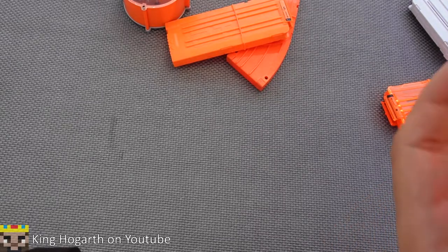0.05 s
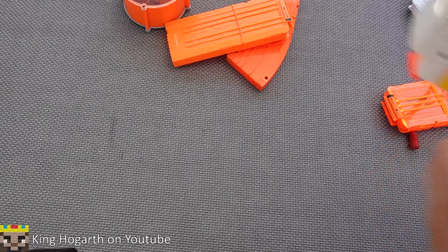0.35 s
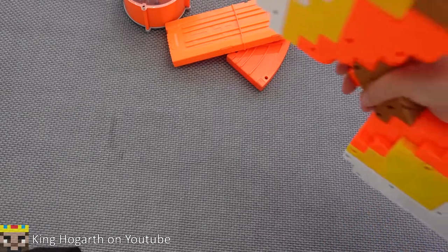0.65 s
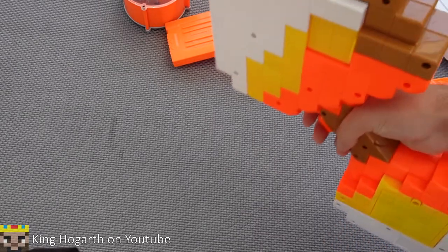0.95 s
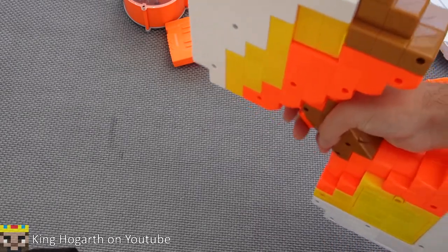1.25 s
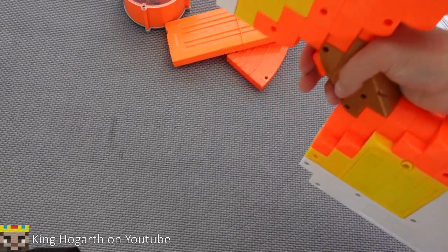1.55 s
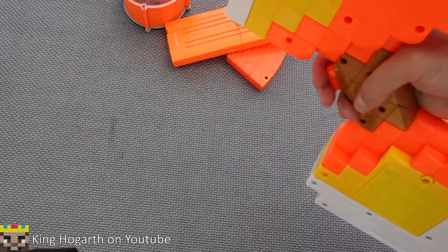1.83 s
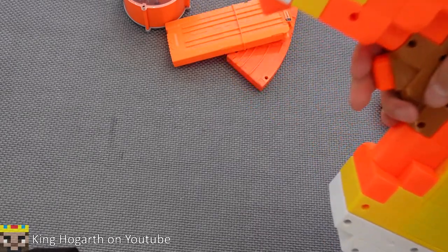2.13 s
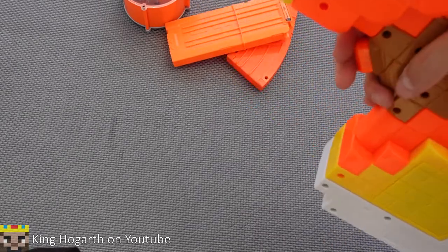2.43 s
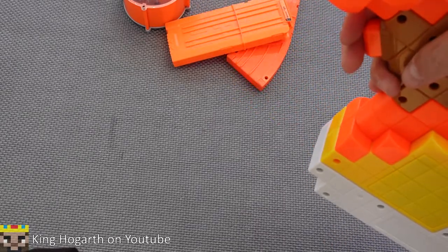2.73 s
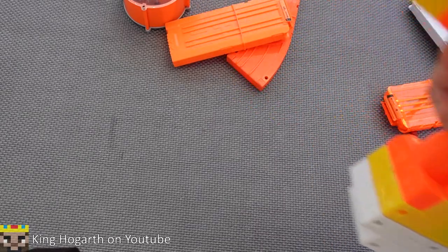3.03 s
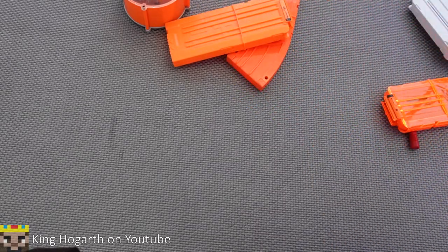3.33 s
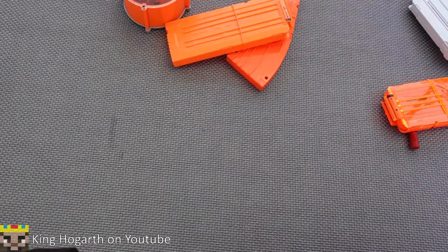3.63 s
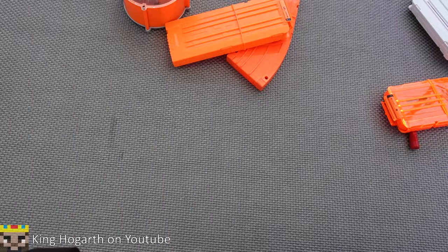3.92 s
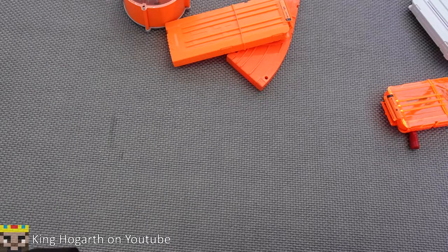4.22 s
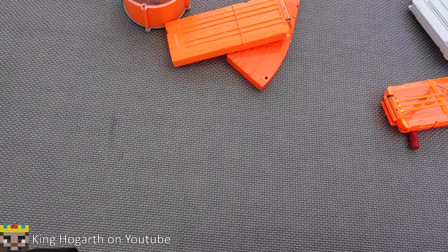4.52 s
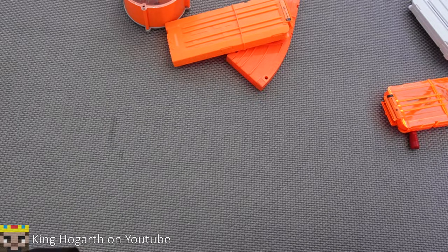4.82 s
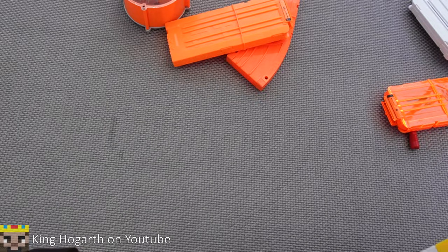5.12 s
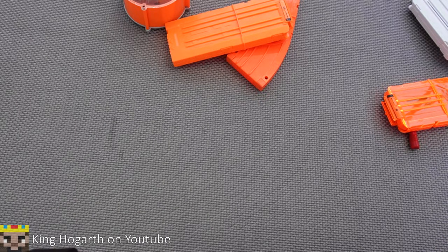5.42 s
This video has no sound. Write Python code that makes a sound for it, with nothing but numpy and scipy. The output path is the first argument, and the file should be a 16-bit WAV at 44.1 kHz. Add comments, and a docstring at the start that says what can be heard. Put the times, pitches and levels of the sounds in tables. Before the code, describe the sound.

Close, sharp plastic clacks as a toy dart blaster is cocked twice, followed by a plastic magazine scraping, rattling and being set down.

```python
"""A small, quiet room. A toy dart blaster is picked up from a mat and its slide is worked twice:
the strokes scrape along the rails by stick and slip, and four of the clacks set the spring ringing.
Then a hollow plastic magazine is pushed against it, rattling and scraping, and is set down with a
few knocks. Clacks and knocks are brief chatter between loose parts, coloured by the plastic shells."""
import sys
import numpy as np
from scipy import signal
from scipy.fft import rfft, irfft
from scipy.io import wavfile
from scipy.ndimage import uniform_filter1d

SR = 44100
rng = np.random.default_rng(int(sys.argv[2]) if len(sys.argv) > 2 else 0)


def inscribe(sig):
    """Save sig as 16-bit PCM at rate SR to the path in sys.argv[1].

    A 1-D sig is mono; a 2-D sig holds one channel per row.
    Samples are clipped to [-1, 1] before scaling.
    """
    pcm = np.round(np.clip(np.atleast_2d(sig).T, -1, 1) * 32767)
    wavfile.write(sys.argv[1], SR, pcm.astype(np.int16))


N = 245284
TIME = np.arange(N) / SR
FFT_SIZE = 4096
HZ = np.maximum(np.fft.rfftfreq(FFT_SIZE, 1 / SR), 1)


def from_db(db):
    """Decibels to gain."""
    return 10 ** (np.asarray(db) / 20)


def rms_one(x):
    """Scale to unit rms."""
    return x / np.sqrt(np.mean(x ** 2) + 1e-20)


def evened(x, window_s):
    """Hold the running rms at 1, leaving the fine grain."""
    return x / np.sqrt(np.abs(uniform_filter1d(x * x, int(window_s * SR))) + 1e-12)


def at_hz(points, hz):
    """Read a table on a log-frequency axis."""
    known_hz, values = np.transpose(points)
    return np.interp(np.log(hz), np.log(known_hz), values)


def add(track, start_s, sound):
    """Mix a sound into a track."""
    start = int(start_s * SR)
    track[start:start + len(sound)] += sound[:N - start]


def cut(x, hz, kind):
    """Third-order Butterworth filter."""
    return signal.sosfilt(signal.butter(3, hz, kind, fs=SR, output="sos"), x)


def coloured(x, gains_db):
    """Minimum-phase filter with gains on the HZ grid."""
    cepstrum = irfft(np.log(from_db(gains_db)))
    cepstrum[1:FFT_SIZE // 2] *= 2
    cepstrum[FFT_SIZE // 2 + 1:] = 0
    return signal.fftconvolve(x, irfft(np.exp(rfft(cepstrum))))[:len(x)]


def share_db(gains_db, low_hz, high_hz):
    """Share of a spectrum's power in one band."""
    power = from_db(gains_db) ** 2
    return 10 * np.log10(power[(HZ > low_hz) & (HZ < high_hz)].sum() / power.sum())


# Each row: frequency in Hz, left-right correlation.
DIFFUSE_CORRELATION = [(60,0.46),(700,0.87),(2000,0.74),(4000,0.22),(8000,.1),(15000,0.11)]

def diffuse(count):
    """White stereo noise at two close microphones: alike in the lows and mids, barely in the treble."""
    mid, side = rfft(rng.standard_normal((2, count)))
    alike = at_hz(DIFFUSE_CORRELATION, np.fft.rfftfreq(count, 1 / SR) + 1)
    return irfft(np.sqrt(1 + alike) * mid + np.sqrt(1 - alike) * side * [[1], [-1]], count)


# Each row: frequency in Hz, relative noise density in dB.
ROOM_NOISE_SPECTRUM = [(15, -64.5), (25, -38), (105, -18), (263, -17), (309, -13), (695, -5), (1040, -1),
                       (1370, -2.5), (2910, -7), (4140, -14), (4870, -12.5), (5730, -14.5), (16000, -30)]

def room_noise(rms_db):
    """Steady, diffuse hush."""
    hush = np.array([coloured(channel, at_hz(ROOM_NOISE_SPECTRUM, HZ)) for channel in diffuse(N)])
    return from_db(rms_db) * rms_one(hush)


# Each row: frequency in Hz, T60 of the tail in seconds.
ROOM_DECAY = [(300,0.47),(800,0.77),(2000,0.27),(5500,0.4),(14000,0.39)]

def room_echoes(x, early_db, early_t60_s, late_db=-19):
    """Quick reflections from things nearby, then a faint tail that dies sooner in the treble."""
    t = TIME[:SR // 2]
    gap_s = .003
    noise = diffuse(len(t)) * np.clip((t - gap_s) / .0026, 0, 1)
    edges_hz = np.geomspace(100, 16000, num=9)
    late = sum(cut(noise, [lo, hi], "band") * from_db(-60 * t / at_hz(ROOM_DECAY, np.sqrt(lo * hi)))
               for lo, hi in zip(edges_hz, edges_hz[1:]))
    early = diffuse(len(t)) * (t > gap_s) * from_db(-60 * t / early_t60_s)
    response = (from_db(early_db) * rms_one(early) + from_db(late_db) * rms_one(late)) / np.sqrt(len(t))
    return signal.fftconvolve(x[None], response, axes=1)[:, :N]


def microphones(x, left_lag_samples, scatter_db, scatter_hz):
    """Direct sound in stereo; treble takes short detours that change as the toy moves."""
    left = np.interp(np.arange(N) - left_lag_samples, np.arange(N), x)
    treble = cut(x, scatter_hz, "high")
    knots_s = np.arange(0, TIME[-1], .03)
    detour_samples = range(5, 45, 4)
    weights = np.array([np.interp(TIME, knots_s, rng.standard_normal(len(knots_s)))
                        for _ in detour_samples])
    weights /= np.linalg.norm(weights, axis=0)
    side = sum(weight * np.roll(treble, lag) for weight, lag in zip(weights, detour_samples))
    return np.array([left, x]) + from_db(scatter_db) * side * [[1], [-1]]


def peak_db(hz, width_hz, lift_db):
    """Bell-shaped lift of one damped resonance."""
    return lift_db / (1 + (2 * (HZ - hz) / width_hz) ** 2)


def plastic_shell_db(colour, modes):
    """Response of a shell: a broad hump with resonances on it."""
    return at_hz(colour, HZ) + sum(peak_db(*mode) for mode in modes)


def driven_mode(hz, width_hz):
    """A damped resonance under random drive: its phase wanders as fast as it is wide."""
    wander = np.cumsum(rng.standard_normal(N)) * np.sqrt(2 * np.pi * width_hz / SR)
    return np.sin(2 * np.pi * hz * TIME + uniform_filter1d(wander, size=40))


def hand_effort(t, start_s, attack_s, hold_s, release_s):
    """A hand movement, 0 to 1: it builds as a power of time, holds and dies away."""
    rise = np.clip((t - start_s) / attack_s, 0, 1) ** 1.68
    return rise * np.exp(-np.clip((t - start_s - attack_s - hold_s) / release_s, 0, 20))


def stick_slip(slips_per_s, spread_db, ring_s, points=8):
    """Random clicks of uneven size at several contact points, each with its own short ring."""
    sizes = from_db(spread_db * np.minimum(rng.exponential(1, N), 4)) * rng.choice([-1, 1], N)
    clicks = sizes * (rng.random(N) < slips_per_s / SR)
    point = rng.integers(points, size=N)
    rings = rng.standard_normal((points, FFT_SIZE)) * np.exp(-TIME[:FFT_SIZE] / ring_s)
    rubbed = sum(signal.oaconvolve(clicks * (point == k), ring)[:N] for k, ring in enumerate(rings))
    mean_power = np.mean(np.abs(rfft(rings)) ** 2, axis=0)
    return coloured(rubbed, -10 * np.log10(mean_power))   # together the points favour no pitch


def clacks(rows, shell_db, ring_width_hz, rise_s, contact_s, ripple_db):
    """Each clack is a few ms of chatter between loose parts, coloured by where the shell is hit."""
    out, t = np.zeros(N), TIME[:FFT_SIZE]
    firm_db, longest_contact_s, level_window_s = -12, .006, .005
    noises = rng.standard_normal((len(rows), FFT_SIZE))
    ripple_hz = np.geomspace(250, 16000, num=48)
    ripples = ripple_db * rng.standard_normal((len(rows), len(ripple_hz)))   # no two blows alike
    thud_band = at_hz([(100, .49), (270, .12), (390, 1), (520, .9), (950, .033)], HZ)
    edge_band = at_hz([(3500, .013), (6500, 1)], HZ)
    for (start_s, db, hz, lift_db, thud_db, edge_db), noise, ripple in zip(rows, noises, ripples):
        linger = from_db(firm_db - db) ** .37   # softer blows chatter longer
        force = noise * np.exp(-t / min(contact_s * linger, longest_contact_s))
        force *= 1 - np.exp(-t / rise_s)   # the plastic gives as contact builds
        force_db = 10 * np.log10(uniform_filter1d(np.abs(rfft(force)) ** 2, size=40) + 1e-9)
        gains_db = shell_db + np.interp(HZ, ripple_hz, ripple) + peak_db(hz, ring_width_hz, lift_db)
        thud_trim_db = thud_band * (thud_db - share_db(gains_db, 200, 700))
        edge_trim_db = edge_band * (edge_db - share_db(gains_db, 5000, 14000))
        # The blow is whitened, so the shell gives the colour.
        clack = coloured(force, gains_db + thud_trim_db + edge_trim_db - force_db)
        add(out, start_s, from_db(db) * clack * np.sqrt(level_window_s * SR / np.sum(clack ** 2)))
    return out


def grip_ticks(shell_db, rms_db):
    """The plastic ticks faintly in the hand."""
    ticks = stick_slip(slips_per_s=25, spread_db=-2.5, ring_s=.0063)
    return from_db(rms_db) * rms_one(coloured(ticks, shell_db))


# Pressing lowers the case's boom. Each row: frequency in Hz, gain in dB.
BOOM_SPECTRUM = [(30,8), (70,4.5), (140,-2), (240,-4.5), (320,9), (450,0), (680,2)]
# Each row: start, attack, hold and release in seconds, level in dB, relative edge and boom in dB.
PUSHES = [(3.428,.022,.012,0.0089,-53,2,-26.5), (3.478,0.026,0.0045,0.034,-34.5,-8.5,-11),
          (3.61,0.04,0.12,0.019,-20.5,-9.5,-14.5), (3.805,0.015,0.21,.032,-19,-4,-13),
          (4.171,0.017,0.065,.050,-20.5,-3.5,-14.5), (4.362,.025,0.025,0.024,-40.5,-2,-41),
          (5.250,.036,0.1,0.022,-20.5,-7.5,-14.5)]

def magazine_scrape(shell_db):
    """Ribs catch and let go in coarse slips; firm pushes make the hollow case boom."""
    rasp = coloured(stick_slip(slips_per_s=900, spread_db=0, ring_s=.0015), shell_db)
    body = evened(cut(rasp, [700, 5200], "band"), window_s=.018)
    edge = evened(cut(rasp, 5230, "high"), window_s=.012)
    boom = evened(cut(coloured(rasp, at_hz(BOOM_SPECTRUM, HZ)), [45, 680], "band"), window_s=.023)
    out = np.zeros(N)
    for *timing, db, edge_db, boom_db in PUSHES:
        push = hand_effort(TIME, *timing)
        edge_gain = from_db(edge_db) * push ** .96   # dies last as the push eases
        boom_gain = from_db(boom_db) * push ** 1.9   # dies first
        out += from_db(db) * (push * body + edge_gain * edge + boom_gain * boom)
    return out


def rattle_rows(per_push=18, knocks_per_s=50, low_hz=1300, high_hz=3600):
    """Small random knocks for clacks(): the magazine jiggles as hard as it is pushed."""
    over_scrape_db, spread_db = 1, 1.5
    lift_db, thud_db, edge_db = 10, -18, -2.5
    rows = []
    for *timing, push_db, _, _ in PUSHES:
        jitter, pitch = rng.random((2, per_push))
        starts_s = np.minimum(timing[0] + (np.arange(per_push) + jitter) / knocks_per_s, TIME[-1])
        effort_db = 20 * np.log10(hand_effort(starts_s, *timing) + 1e-6)
        levels_db = push_db + over_scrape_db + effort_db - spread_db * rng.standard_normal(per_push)
        rings_hz = low_hz * (high_hz / low_hz) ** pitch
        rows += [(*knock, lift_db, thud_db, edge_db) for knock in zip(starts_s, levels_db, rings_hz)]
    return rows


# Each row: frequency in Hz, gain in dB.
MAGAZINE_SHELL_SPECTRUM = [(30,-44),(140,-27.5),(240,-23.5),(340,-11.5),(450,-2),(750,-9),(1400,-2),(2400,0.5),(4700,-3),(7500,-18.5),(11000,-25),(16000,-34)]
# Each row: frequency in Hz, width in Hz, lift in dB.
MAGAZINE_SHELL_MODES = [(407,120,3.7),(466,78,3),(714,70,3.8),(1030,58,4.8),(1315,44,3.8),(1730,320,2.9),(2630,480,2.9),(3370,220,1.55),(4270,550,0.93)]
# Each row: start in seconds, level in dB, ring in Hz, its lift in dB, thud in dB, edge in dB.
MAGAZINE_HITS = [(.526,-18.5,4400,5.5,-13.5,-5), (3.354,-40,1780,8,-0.5,-40), (3.513,-16,1750,3,-21.5,-7),
                 (3.556,-22.5,1780,4.5,-17.5,-11.5), (3.618,-18.5,1580,8,-21,-8),
                 (3.643,-19.5,4100,15,-32,-15), (3.658,-14.5,2660,12,-5.5,-8), (3.669,-15,2220,9,-23,-10),
                 (3.681,-12,2030,7,-39,-8), (3.731,-15.5,1680,6,-20,-4), (3.747,-13.5,1330,15,-14,-7),
                 (3.819,-11.5,1920,2,-7.5,-29), (3.836,-9.5,2940,7,-8,-3), (3.9,-15,3250,15,-16,-3),
                 (3.91,-16.5,2490,15,-20,-20), (3.958,-12,2650,6,-30,-8), (3.939,-12,3500,14,-12,-3),
                 (3.981,-9.5,2640,6,-15,-5), (4.0,-13,3600,4,-6,-14), (4.031,-13.5,2380,2,-20,-12),
                 (4.058,-17,4970,6,-33,4.5), (4.145,-38,2440,9,-24,-9), (4.159,-40.5,1680,16,-6,-15),
                 (4.18,-13,1030,9,-12.5,-36), (4.186,-13.5,2700,10,-38,-37), (4.208,-12,2760,2,-19,-11),
                 (4.218,-13.5,1950,11,-37,-24), (4.265,-14.5,2800,13,-42,1), (4.332,-23,2820,14,-35,-1.5),
                 (4.354,-23.5,3550,16,-32,-3), (4.403,-24.5,2790,20,-44,-0.5), (4.446,-36,1970,0,-34,-8),
                 (4.529,-36.5,1400,14,-21,-17), (4.544,-38.5,2020,6,-12,-20), (4.599,-19,1580,7,-28,-8),
                 (4.642,-24,1570,10,-7,-20.5), (4.685,-30.5,1387,15,-4,-27),
                 (5.054,-44.5,1300,13,-35.5,-37), (5.228,-22.5,1690,9,-21,-13),
                 (5.245,-26.5,1730,6,-11,-15), (5.284,-16.5,2000,5,-17,-13), (5.292,-16.5,1750,5,-23,-10),
                 (5.303,-18,2180,14,-27,-22), (5.322,-13.5,2080,11,-34,-32),
                 (5.348,-11.5,1650,11.5,-11,-13), (5.382,-12.5,2170,7,-23,-49), (5.415,-19,1550,12,-28,-5),
                 (5.473,-21.5,1540,8.5,-39,-6)]

def magazine():
    """The hollow case knocks, rattles and scrapes."""
    shell_db = plastic_shell_db(MAGAZINE_SHELL_SPECTRUM, MAGAZINE_SHELL_MODES)
    rows = list(MAGAZINE_HITS) + rattle_rows()
    knocks = clacks(rows, shell_db, ring_width_hz=400, rise_s=.00045, contact_s=.0046, ripple_db=3)
    return knocks + magazine_scrape(shell_db)


# Each row: frequency in Hz, width in Hz, level in dB.
CATCH_RESONANCES = [(8320,280,-18.5), (10400,600,-23.5), (13200,1200,-34)]

def catch_zing(centre_s=.758, spread_s=.0035):
    """The catch snaps in and briefly feeds a few high, narrow resonances."""
    swell = np.exp(-np.minimum(((TIME - centre_s) / spread_s) ** 2, 20))
    return swell * sum(from_db(db) * driven_mode(hz, width_hz) for hz, width_hz, db in CATCH_RESONANCES)


# Each row: frequency in Hz, relative level in dB, T60 in seconds.
SPRING_RESONANCES = [(1260,-16,0.81),(2500,-9,0.65),(3567,4.5,0.24),(4640,-8.5,0.36),(5141,3,0.2),(5760,-2,.23),(6270,-7.5,0.41),(6907,-7.5,0.28)]
# Each row: start in seconds, level in dB.
SPRING_HITS = [(0.756,-39.5),(0.796,-36.5),(2.445,-41),(2.665,-43.5)]
# A note the catch stops: start and stop in seconds, frequency in Hz, level in dB, T60 in seconds.
STOPPED_NOTE = (2.447, 2.514, 3628, -25, .5)

def spring_ring():
    """The jolted steel spring rings on after the plastic, its modes in close, beating pairs."""
    out, t = np.zeros(N), TIME[:SR]
    for start_s, jolt_db in SPRING_HITS:
        for hz, db, t60_s in SPRING_RESONANCES:
            beat_hz = rng.uniform(37, 70)
            pair = np.sin(2 * np.pi * hz * t) + .6 * np.sin(2 * np.pi * (hz + beat_hz) * t)
            add(out, start_s, from_db(jolt_db + db - 60 * t / t60_s) * pair)
    start_s, stop_s, hz, db, t60_s = STOPPED_NOTE
    damping = np.exp(-np.maximum(t - (stop_s - start_s), 0) / .0043)
    add(out, start_s, from_db(db - 60 * t / t60_s) * damping * np.sin(2 * np.pi * hz * t))
    return out


# Each row: frequency in Hz, width in Hz, relative level in dB.
RAIL_RESONANCES = [(1975,340,-6.5), (2703,180,3), (4120,200,-1), (5680,180,-0.5), (8830,500,-9.5),
                   (11060,770,-15)]
# Each row: start, attack, hold and release in seconds, level in dB, relative edge and squeal in dB.
STROKES = [(0.694,0.049,0.011,0.033,-24.5,-1,-2.5), (1.592,0.012,0.0047,0.01,-31.5,-11,-21),
           (1.97,0.011,0.12,0.029,-29,-12,-11), (2.354,0.073,0.027,0.016,-23.5,-8.5,-3.5),
           (2.955,0.066,0.044,0.017,-28,-11,-4.5)]

def slide_scrape(shell_db, edge_hz=5000):
    """The slide rasps and squeals along its rails; a stroke with more edge wakes the high resonances."""
    rasp = coloured(stick_slip(slips_per_s=3500, spread_db=2.5, ring_s=.0008), shell_db)
    low_rasp = evened(cut(rasp, 4400, "low"), window_s=.033)
    high_rasp = evened(cut(rasp, 5930, "high"), window_s=.012)
    notes = [(hz, from_db(db) * driven_mode(hz, width_hz)) for hz, width_hz, db in RAIL_RESONANCES]
    low_squeal = sum(note for hz, note in notes if hz < edge_hz)
    high_squeal = sum(note for hz, note in notes if hz >= edge_hz)
    out = np.zeros(N)
    for *timing, db, edge_db, squeal_db in STROKES:
        body = low_rasp + from_db(squeal_db) * low_squeal
        edge = high_rasp + from_db(squeal_db) * high_squeal
        out += from_db(db) * hand_effort(TIME, *timing) * (body + from_db(edge_db) * edge)
    return out


# Each row: frequency in Hz, gain in dB.
BLASTER_SHELL_SPECTRUM = [(30,-59),(170,-40.5),(330,-29.5),(700,-17.5),(1300,-6),(2200,1.5),(4000,-4.5),(6000,-14),(8000,-22),(11000,-31),(16000,-40.5)]
# Each row: frequency in Hz, width in Hz, lift in dB.
BLASTER_SHELL_MODES = [(726,120,5),(994,120,6),(1330,64,8),(1937,370,3.5),(2650,590,1),(3600,160,4),(4260,460,5.5),(5870,300,5),(8930,280,1)]
# Each row: start in seconds, level in dB, ring in Hz, its lift in dB, thud in dB, edge in dB.
BLASTER_HITS = [(.153,-49.5,3000,2,-27,-8), (.336,-37.5,2630,18.5,-40,-24), (.557,-29,1330,8,-40,-7),
                (.571,-33.5,2540,6,-42,-5), (.641,-36.5,1830,10,-9,-16), (.756,-10.5,3810,17,-25,3),
                (.795,-12.5,4400,6,-15.5,-8.5), (.915,-41,1100,14,-12,-34), (1.011,-41.5,1920,6,-12,-13),
                (1.605,-19,3830,18.5,-20,-21), (1.615,-24,980,17,-12.5,-47), (1.655,-34.5,1820,6,-14,-18),
                (1.933,-17.5,2110,2.5,-34,-10.5), (1.956,-21,1680,15,-17,-19), (1.974,-15,1900,5,-27,-18),
                (1.98,-14,1760,7.5,-19,-9), (2.139,-11.5,1330,3.5,-33.5,-11),
                (2.446,-15.5,3600,11,-31,-7.5), (2.514,-19.5,1590,10.5,-21,-16.5),
                (2.538,-19.5,2000,3,-8.5,-20.5), (2.6645,-11,2200,6.5,-17,-14.5),
                (2.982,-13,2550,0,-29.5,-13.5), (3.008,-23,2900,9,-27,-27),
                (3.092,-14.5,1320,0.5,-49,-16.5)]

def blaster():
    """Clacks, slide and grip sound through one shell; spring and catch ring on their own."""
    shell_db = plastic_shell_db(BLASTER_SHELL_SPECTRUM, BLASTER_SHELL_MODES)
    hits = clacks(BLASTER_HITS, shell_db, ring_width_hz=450, rise_s=.00025, contact_s=.0036, ripple_db=1)
    return hits + slide_scrape(shell_db) + spring_ring() + catch_zing() + grip_ticks(shell_db, rms_db=-65)


# Where the toy is held. Each row: time in seconds, left minus right in dB.
BALANCE = [(.5,-3),(.8,-1),(2.0,-1.5),(2.6,-2),(3.0,-4),(4.0,-3),(4.6,-4),(5.4,-4)]

def scene():
    """Blaster and magazine close to the microphones, a little to the right, in a quiet room."""
    blaster_mono, magazine_mono = blaster(), magazine()
    toy = microphones(blaster_mono, left_lag_samples=0, scatter_db=-11, scatter_hz=4800)
    toy += room_echoes(blaster_mono, early_db=-9.5, early_t60_s=.12)
    toy += microphones(magazine_mono, left_lag_samples=1, scatter_db=-7.5, scatter_hz=4350)
    toy += room_echoes(magazine_mono, early_db=-15, early_t60_s=.14)
    balance_db = np.interp(TIME, *np.transpose(BALANCE))
    toy *= from_db(balance_db * [[.5], [-.5]])
    return toy + room_noise(rms_db=-55.5)


def record(dry):
    """Round only the highest peaks, then low-pass at 16 kHz."""
    rounded = dry / (1 + dry ** 8) ** (1 / 8)
    return signal.sosfiltfilt(signal.ellip(8, .05, 60, 16000, fs=SR, output="sos"), rounded)


dry = scene()
out = record(dry)
inscribe(out)
```